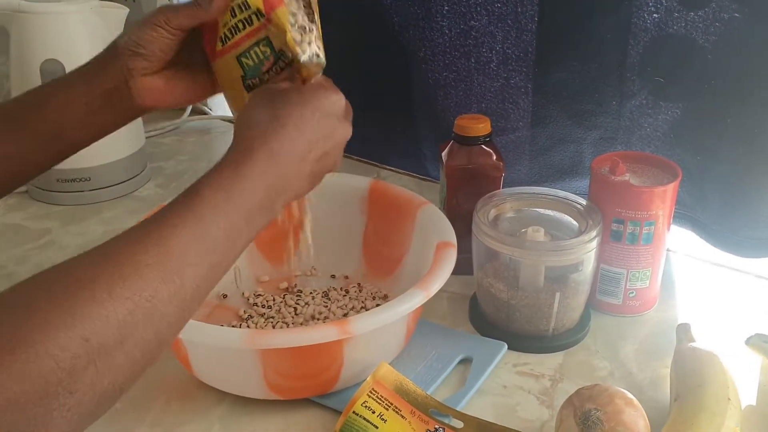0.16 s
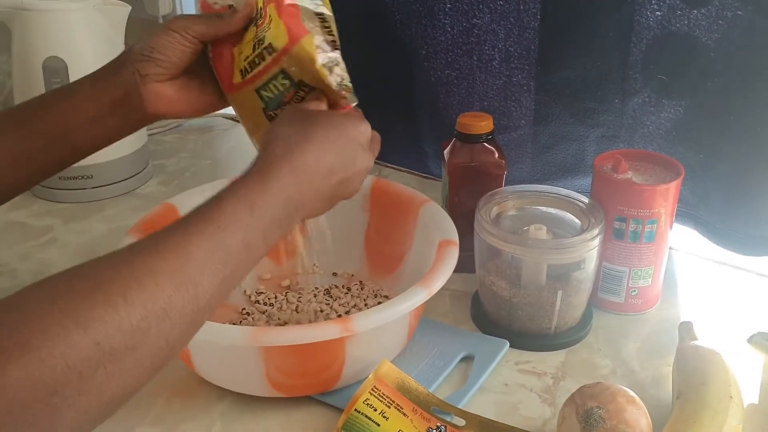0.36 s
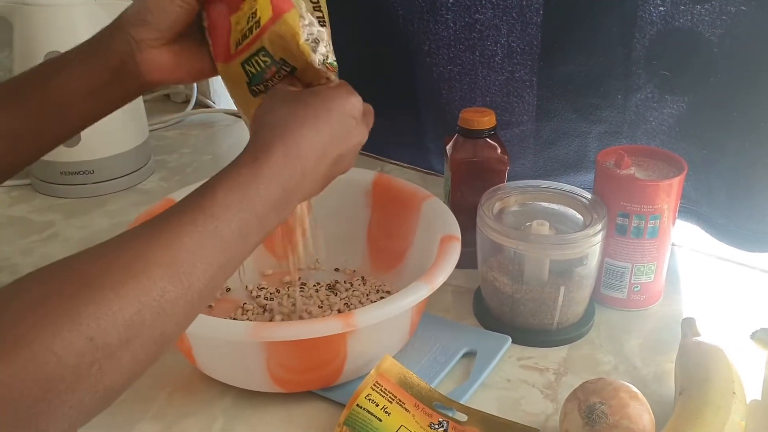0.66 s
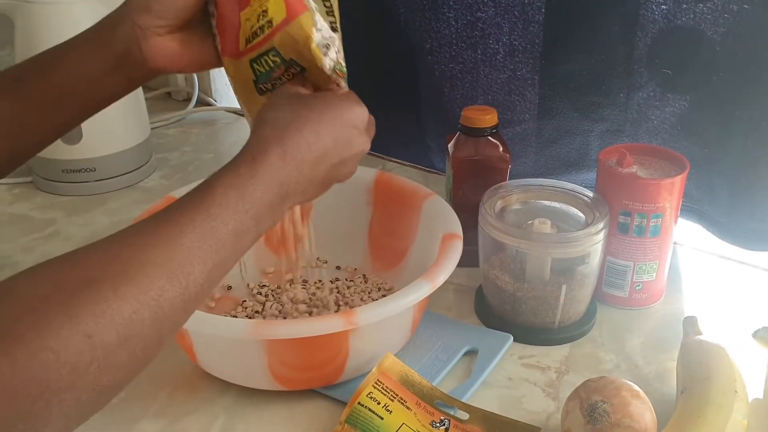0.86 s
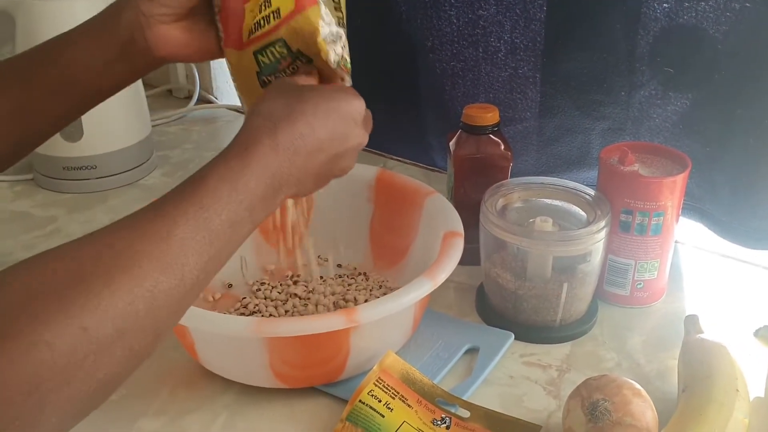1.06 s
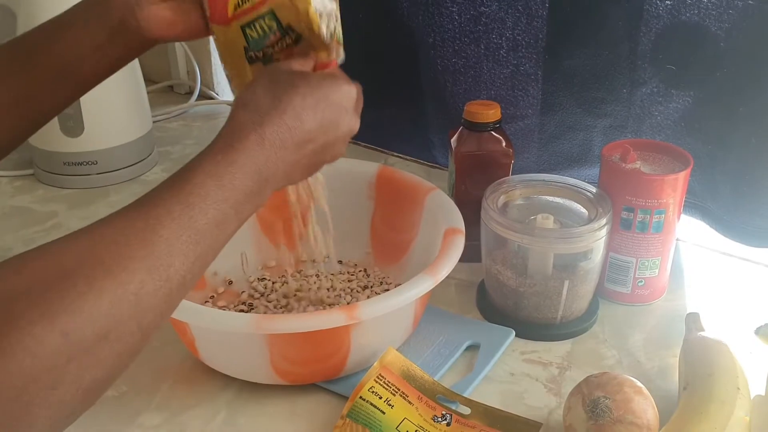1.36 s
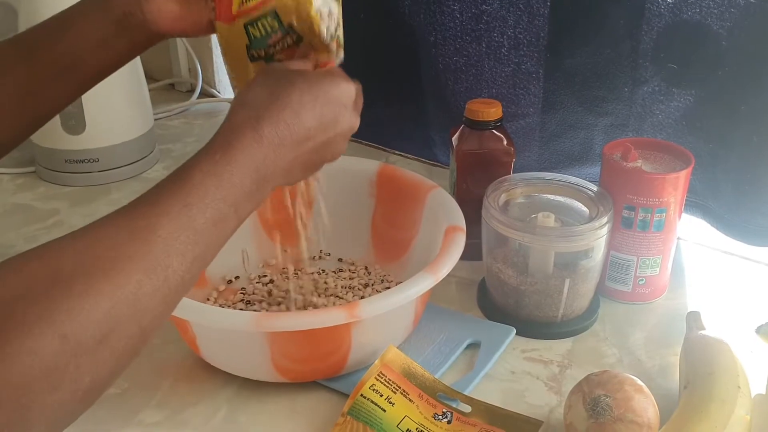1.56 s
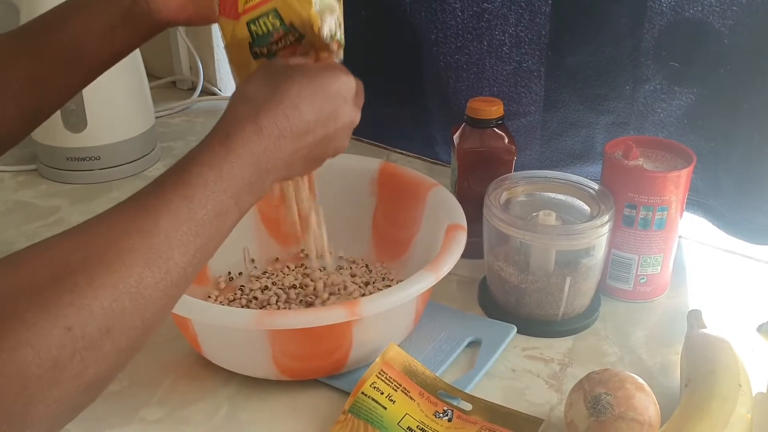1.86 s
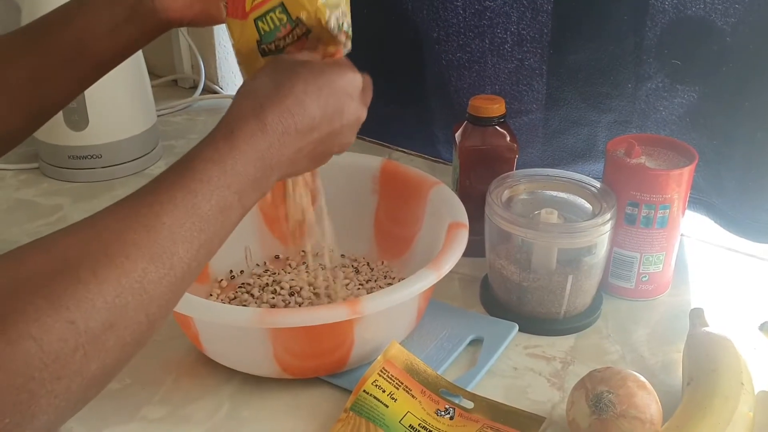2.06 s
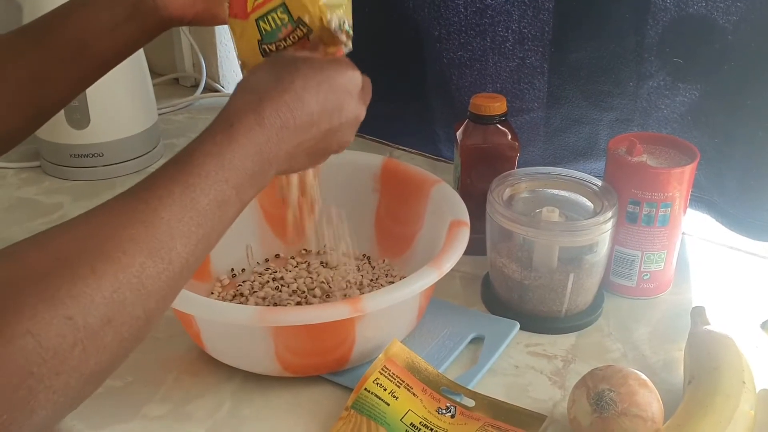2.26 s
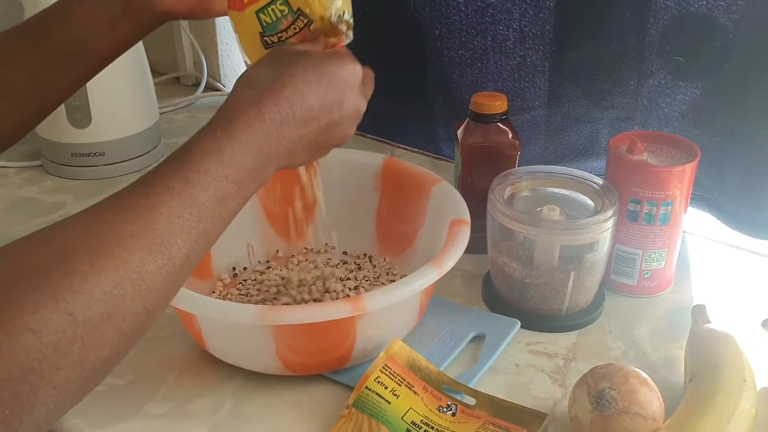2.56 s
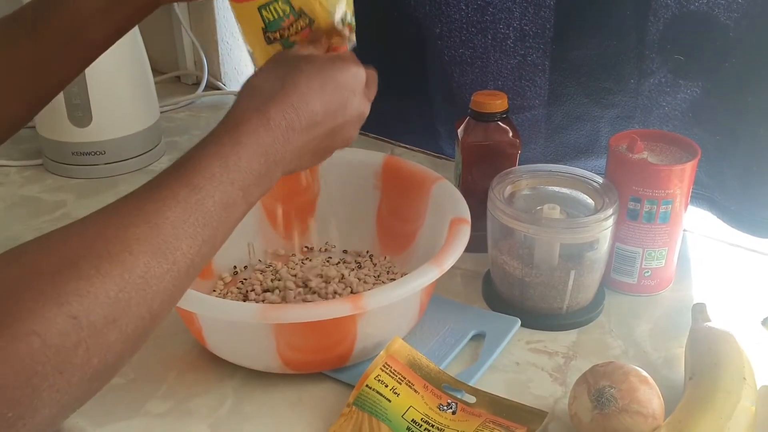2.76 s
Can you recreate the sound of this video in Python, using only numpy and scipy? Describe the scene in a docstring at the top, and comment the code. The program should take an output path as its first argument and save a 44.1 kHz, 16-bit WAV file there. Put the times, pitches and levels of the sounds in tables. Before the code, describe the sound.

Dried beans pour into a plastic bowl, starting sparse, quickly swelling to a dense rattle with sharp clicks and hollow plastic knocks, then thinning out; faint packet crinkle, close stereo microphone in a small kitchen.

```python
"""Dried beans are shaken out of a plastic packet into a plastic bowl on a kitchen counter.
Beans landing on the heap are short pitched clicks; knocks ring the tuned modes of the bowl wall.
Sharp hits stand out as cracks, tones and knocks; the packet rustles as coloured fine crinkles.
Underneath lie a low filtered-noise rumble and a narrow hum that wavers in level and pitch."""
import sys
import numpy as np
from scipy import signal
from scipy.fft import rfft, irfft, next_fast_len
from scipy.io import wavfile

SR = 44100
rng = np.random.default_rng(int(sys.argv[2]) if len(sys.argv) > 2 else 0)


def voltage_ratio(level):
    """Linear amplitude factor for a level in decibels (scalar or array-like)."""
    return 10 ** (np.asarray(level, float) / 20)


def persist_wave(psi):
    """Save psi, clipped to +-1, as 16-bit WAV."""
    counts = np.round(np.clip(psi, -1, 1) * 32767).astype(np.int16)
    wavfile.write(sys.argv[1], SR, np.atleast_2d(counts).T)


N = 127890

# Low rumble of the room, spectrum: pitch_hz [Hz], density_db [dB per Hz]
RUMBLE_SPECTRUM = [(33, -37), (56, 13), (124, 14.5), (177, 19), (231, -73), (330, 0), (430, -20),
                   (730, -120)]
# Level curve of the hum, before its random wavering: start_s [s], level_db [dB]
HUM_LEVEL = [(0.0, -70), (0.04, -65), (0.25, -76), (0.44, -64), (0.64, -75), (0.73, -54), (1.56, -65),
             (1.68, -56), (2.17, -60), (2.21, -61.5), (2.5, -55.5), (2.71, -67), (2.75, -58), (2.9, -76)]
# Rustle of the packet film, spectrum: pitch_hz [Hz], density_db [dB per Hz]
PACKET_SPECTRUM = [(4410, -33), (7500, -3), (10100, -2.5), (13900, 2.5), (15700, -7.5), (16400, -29)]
# Modes of the bowl wall, relative strengths: pitch_hz [Hz], level_db [dB]
BOWL_MODES = [(170, -20), (260, -44), (345, -41), (430, -21), (550, -2), (620, -0.5), (705, 0.5), (790, -8),
              (1037, -5), (1170, -5.5), (1300, -7.5), (1440, -2), (1645, -1.5), (1740, -6.5), (1900, -10),
              (2000, -10.5), (2450, 1), (2630, -7), (2990, -7)]
# Beans landing on the bare wall ring its hollow middle modes more: start_s [s], boost_db [dB]
HOLLOW_BOOST = [(0.0, -0.5), (0.3, -2), (0.42, 0.5), (0.55, 1.5), (0.65, 7), (0.8, 2.5), (0.95, 3.5),
                (1.1, -1), (1.3, 3), (1.5, -1), (1.8, 0.5), (2.3, 1), (2.9, 1.5)]
# Clicks of beans on the heap, spectrum: pitch_hz [Hz], density_db [dB per Hz]
HEAP_SPECTRUM = [(470, -40), (800, -0.5), (900, -5.5), (1600, 0.5), (2100, -2), (2750, -6.5), (3200, -2),
                 (3600, -0.5), (4300, -4), (4800, -7.5), (5600, -7), (6700, -7), (7800, -22), (9000, -17.5),
                 (11700, -69), (19800, -120)]
# Crack of a sharp hit, spectrum: pitch_hz [Hz], density_db [dB per Hz]
CRACK_SPECTRUM = [(500, -30), (1500, -11), (3300, 0), (6900, -2), (8200, -17), (12000, -23), (16000, -27)]
# Sharp hits of beans, each one or several close-set rows, before the common trim:
# start_s [s], level_db [dB], pitch_hz [Hz], crack_db [dB re the tone]
SHARP_HITS = [(0.0058, -9, 1430, -0.5), (0.0934, -12, 1440, -9), (0.1024, -11, 1610, -9),
              (0.116, -3.5, 1620, -9), (0.159, -13, 1590, -2), (0.179, -5, 1590, -9), (0.2548, -7, 3700, 7),
              (0.406, -8.5, 1630, 5), (0.4652, -9, 3700, 2), (0.5082, -5, 1730, -2), (0.649, -6, 3870, -10),
              (0.9233, -3.5, 1700, -4), (0.9784, -6, 3500, -14), (1.0012, 2.5, 3850, -7.5),
              (1.0461, -9.5, 2040, 4), (1.0845, -4, 2460, 1), (1.2876, -0.5, 3460, -12),
              (1.2998, 0, 2220, 1), (1.5824, -1.5, 3720, -6), (1.642, -0.5, 3380, -10),
              (1.809, -0.5, 4200, -3.5), (1.8396, -13, 2380, -10), (1.9225, -5, 2430, -11),
              (2.021, -18, 2590, 10.5), (2.052, -4, 1680, -10), (2.0593, 3, 1700, -22),
              (2.063, -6, 1340, -15), (2.1086, -7, 1310, -13), (2.2565, -4.5, 1330, -18),
              (2.266, -3, 1350, -21), (2.275, -5, 1690, -15), (2.3732, -0.5, 6200, 0),
              (2.3744, -4, 3400, -9.5), (2.4641, -5, 3900, -2), (2.5536, -5.5, 1620, -1),
              (2.6037, -4, 4240, -4), (2.6048, -7, 3020, -10), (2.607, -8.5, 2040, -18),
              (2.615, -13, 3800, -4), (2.6773, -17, 1440, 5), (2.821, -7.5, 2350, -5.5),
              (2.8466, 0, 3370, -5), (2.8518, -9, 1520, -14), (2.8895, -13, 1700, 3)]
# The pouring stream, before the layer trims:
# start_s [s], heap_db [dB], bowl_db [dB re heap], packet_db [dB re heap]
STREAM_LEVELS = [(0.0, -29.5, 5.5, -14), (0.08, -41, 1.5, -23), (0.109, -31, 1.5, -17.5),
                 (0.149, -39, 2, -17), (0.177, -28.5, -1.5, -17), (0.23, -31, 1.5, -17),
                 (0.257, -25.5, -0.5, -14), (0.288, -26.5, -2.5, -18), (0.334, -23.5, -7, -20.5),
                 (0.389, -29.5, 1, -16.5), (0.44, -25.5, -5, -18), (0.475, -26, 0, -18.5),
                 (0.53, -26.5, -4.5, -20), (0.58, -23, -3, -20), (0.675, -23, -7, -17.5),
                 (0.73, -25.5, -4, -19), (0.78, -26.5, -2.5, -18), (0.81, -23, -2, -19),
                 (0.83, -26, -3, -17), (0.894, -22, -2.5, -19), (1.037, -27.5, -4, -19),
                 (1.095, -21.5, -4, -16), (1.136, -25, -1, -19.5), (1.305, -22, -4.5, -17.5),
                 (1.344, -24, -3.5, -19.5), (1.416, -25.5, -1, -19.5), (1.494, -20, -5.5, -15.5),
                 (1.559, -26.5, 0, -20), (1.596, -24.5, 0.5, -15.5), (1.631, -28, 0, -18),
                 (1.653, -24, -3.5, -16), (1.702, -24, -1, -16), (1.772, -28.5, -1.5, -16),
                 (1.804, -27.5, -0.5, -15), (1.839, -27.5, -2.5, -17), (1.881, -24.5, -6, -14),
                 (2.001, -30, 1, -15.5), (2.068, -25.5, -6.5, -11.5), (2.15, -32, 2.5, -13),
                 (2.214, -29, 0, -14.5), (2.268, -26, -3.5, -12.5), (2.355, -32.5, 0.5, -11.5),
                 (2.475, -27.5, -3, -13.5), (2.581, -32.5, -0.5, -15), (2.612, -31, -2.5, -14),
                 (2.668, -33.5, 5.5, -11), (2.703, -29.5, -2, -12.5), (2.789, -39, 4, -13),
                 (2.833, -40, 6, -14), (2.857, -34, -2.5, -6), (2.899, -33, 5, -14)]

# Room
RUMBLE_DB, RUMBLE_SIDE_DB = -60.5, -10  # the side is relative to the mid
HUM_HZ, HUM_WIDTH_HZ = 42, 3.7  # centre and spread of the wandering pitch
KITCHEN_T60_S, KITCHEN_DB, WALL_CUT_HZ = 0.15, -5.5, 6200

# Pouring: mean impact rates, spreads of impact size, layer trims
SPOTS = 16  # landing places
CLUMP_DB, CLUMP_HZ = 1.26, 39.9  # spread and rate of the swings in density
CRINKLES_PER_S, CRINKLE_SPREAD_DB, PACKET_TRIM_DB = 4000, 3.5, 2.2
KNOCKS_PER_S, KNOCK_SPREAD_DB, BOWL_TRIM_DB = 1200, 2.0, 1
BEANS_PER_S, SIZE_SPREAD_DB, HEAP_TRIM_DB = 3500, 2, 1.31
BEAN_CYCLES, BEAN_LOW_HZ, BEAN_HIGH_HZ = 5.9, 898, 10160  # cycles to fall by 60 dB

# Bowl wall
BOWL_T60_S, TRIPLET_SPLIT = 0.04, 0.009  # split as a fraction of the mode pitch
HOLLOW_FROM_HZ, HOLLOW_TO_HZ = 1400, 2100
FILL_DB_PER_S, FILL_FROM_HZ, FILL_BELOW_HZ = -1.5, 300, 900  # the deepening heap damps the low modes

# Sharp hits
HIT_TRIM_DB, HIT_KNOCK_DB = -3, -28
TONE_CYCLES, TONE_RISE_S = 20.0, 0.0006  # cycles to fall by 60 dB
CRACK_T60_S, CRACK_RISE_S = 0.012, 0.0008

# Path to the microphone
SCATTER_T60_S, SCATTER_FROM_HZ = 0.023, 1970
SCATTER_DB, HIT_SCATTER_DB = 5, -9
LEFT_LAG_S, LAG_SPREAD_S = -0.000045, 0.00004  # left behind right; negative is ahead
LEFT_DB = 0.45  # left is raised and right lowered by this
LOW_CUT_HZ = 213  # low cut of the microphone on the pouring sounds, without the room tone
TOP_HZ = 16560


def rms_one(x):
    """Scale to rms 1."""
    return x / np.sqrt(np.mean(x ** 2) + 1e-20)


def in_time(rows):
    """Draw the columns of a curve table sample by sample."""
    start_s, *columns = np.transpose(rows)
    return [np.interp(np.arange(N) / SR, start_s, column) for column in columns]


def colour(x, spectrum):
    """Filter causally (minimum phase) to the given spectrum, by folding its cepstrum."""
    size = 8192
    hz, db = np.transpose(spectrum)
    bins_hz = np.arange(size // 2 + 1) * SR / size
    log_gain = np.interp(np.log(bins_hz + 1), np.log(hz), db) * np.log(10) / 20
    cepstrum = irfft(log_gain)
    cepstrum[1:size // 2] *= 2
    cepstrum[size // 2 + 1:] = 0
    impulse = irfft(np.exp(rfft(cepstrum)))
    filtered = signal.fftconvolve(np.atleast_2d(x), impulse[None], axes=1)
    return filtered[:, :np.shape(x)[-1]].reshape(np.shape(x))


def drift(rate_hz):
    """Slow random wandering with spread 1: noise through a double one-pole low-pass."""
    r = np.exp(-2 * np.pi * rate_hz / SR)
    slow = signal.lfilter([1], [1, -2 * r, r * r], rng.standard_normal(N + SR))[SR:]
    return rms_one(slow - slow.mean())


def ring(impacts, hz, t60_s):
    """Damped resonator: a unit impact sets a sine of height 1 ringing."""
    r, w = voltage_ratio(-60 / (t60_s * SR)), 2 * np.pi * hz / SR
    return signal.lfilter([0, np.sin(w)], [1, -2 * r * np.cos(w), r * r], impacts + 1e-18)


def random_impacts(per_s, spread_db, clump):
    """Chance impacts of uneven size and either sign, denser in clumps."""
    sizes = voltage_ratio(spread_db * np.minimum(rng.exponential(1, N), 5)) * rng.choice([-1, 1], N)
    return sizes * (rng.random(N) < per_s * clump / SR)


def deal_to_spots(impacts):
    """Send each impact to one landing spot picked by chance."""
    return impacts * (rng.integers(0, SPOTS, N) == np.arange(SPOTS)[:, None])


def dying_noise(t60_s, size):
    """Two unrelated bursts of noise dying exponentially, unit energy each."""
    burst = rng.standard_normal((2, size)) * voltage_ratio(-60 * np.arange(size) / SR / t60_s)
    return burst / np.sqrt(np.sum(burst ** 2, axis=1, keepdims=True))


def room_tone():
    """Low coloured rumble and a sine hum wavering in level and pitch, nearly alike on both sides."""
    noise = rng.standard_normal((2, N))
    mid, side = rms_one(colour(noise, RUMBLE_SPECTRUM)) * voltage_ratio(RUMBLE_DB)
    hum_db = in_time(HUM_LEVEL)[0] + 4.2 * drift(3.4)
    turns = np.cumsum(HUM_HZ + HUM_WIDTH_HZ * drift(3.2)) / SR
    hum = voltage_ratio(hum_db) * np.sqrt(2) * np.sin(2 * np.pi * turns)
    return mid + hum + voltage_ratio(RUMBLE_SIDE_DB) * side * [[1], [-1]]


def kitchen(x):
    """Room reverb: a dull dying tail, other on each side, starting 5 ms late."""
    walls = signal.lfilter(*signal.butter(1, WALL_CUT_HZ, fs=SR), dying_noise(KITCHEN_T60_S, SR // 2))
    walls = np.pad(walls, ((0, 0), (SR // 200, 0)))
    return voltage_ratio(KITCHEN_DB) * signal.fftconvolve(x[None], walls, axes=1)[:, :N]


def to_microphone(x, scatter_db, lag_spread_s):
    """Direct sound with a small lag between sides, and treble scattered by the bowl, other on each side."""
    lag = (LEFT_LAG_S + lag_spread_s * rng.standard_normal()) * SR
    size = next_fast_len(N + 2000)
    # half the lag on each side, as opposite phase turns
    turn = np.exp(-1j * np.pi * lag * np.arange(size // 2 + 1) / size)
    direct = irfft(rfft(x, size) * [turn, turn.conj()], size)[:, :N]
    treble = signal.butter(2, SCATTER_FROM_HZ, "high", fs=SR)
    scatter = signal.lfilter(*treble, dying_noise(SCATTER_T60_S, 1500))
    return direct + voltage_ratio(scatter_db) * signal.fftconvolve(x[None], scatter, axes=1)[:, :N]


def packet(clump):
    """Thin plastic film rustles as many fine crinkles, coloured by a filter."""
    crinkles = random_impacts(CRINKLES_PER_S, CRINKLE_SPREAD_DB, clump)
    return rms_one(colour(deal_to_spots(crinkles), PACKET_SPECTRUM)) / np.sqrt(SPOTS)


def bowl(knocks):
    """Knocks strike each wall mode at random strength; each is a close triplet radiating from different spots."""
    out = np.zeros((SPOTS, N))
    hollow_db, = in_time(HOLLOW_BOOST)
    fill_db = FILL_DB_PER_S * np.arange(N) / SR
    for k, (hz, db) in enumerate(BOWL_MODES):
        level_db = db + (FILL_FROM_HZ < hz < FILL_BELOW_HZ) * fill_db
        level_db = level_db + (HOLLOW_FROM_HZ < hz < HOLLOW_TO_HZ) * hollow_db
        for part in range(3):
            strikes = knocks * voltage_ratio(level_db) * rng.standard_normal(N)
            part_hz = hz * (1 + TRIPLET_SPLIT * (part - 1))
            out[(k + 3 * part) % SPOTS] += ring(strikes, part_hz, BOWL_T60_S)
    return out


def sharp_hits():
    """Each row is a short noise crack plus a decaying tone; also returns the knocks on the wall."""
    out, knocks, t = np.zeros(N + SR), np.zeros(N), np.arange(SR // 20) / SR
    crack_shape = (1 - np.exp(-t / CRACK_RISE_S)) * voltage_ratio(-60 * t / CRACK_T60_S)
    cracks = colour(rng.standard_normal((len(SHARP_HITS), len(t))) * crack_shape, CRACK_SPECTRUM)
    for (start_s, db, hz, crack_db), crack in zip(SHARP_HITS, cracks):
        i = int(start_s * SR)
        tone_shape = (1 - np.exp(-t / TONE_RISE_S)) * voltage_ratio(-60 * t * hz / TONE_CYCLES)
        tone = tone_shape * np.sin(2 * np.pi * hz * t)
        crack = voltage_ratio(crack_db) * crack / np.abs(crack).max()
        out[i:i + len(t)] += voltage_ratio(db + HIT_TRIM_DB) * (crack + tone)
        knocks[i] = voltage_ratio(db + HIT_TRIM_DB + HIT_KNOCK_DB)
    return out[:N], knocks


def heap(clump):
    """Beans click on the heap, each at one of 30 pitches, a few cycles long, at any one of the spots."""
    falls = deal_to_spots(random_impacts(BEANS_PER_S, SIZE_SPREAD_DB, clump))
    dealt = rng.integers(0, 30, N)
    out = np.zeros((SPOTS, N))
    for k, hz in enumerate(np.geomspace(BEAN_LOW_HZ, BEAN_HIGH_HZ, 30)):
        out += hz * ring(falls * (dealt == k), hz, BEAN_CYCLES / hz)
    return rms_one(colour(out, HEAP_SPECTRUM)) / np.sqrt(SPOTS)


def scene():
    """Mix many landing spots, each with its own path to the microphone, over the room tone."""
    heap_db, bowl_db, packet_db = in_time(STREAM_LEVELS)
    clump = voltage_ratio(CLUMP_DB * drift(CLUMP_HZ))
    hits, hit_knocks = sharp_hits()
    stream_knocks = random_impacts(KNOCKS_PER_S, KNOCK_SPREAD_DB, clump)
    wall = rms_one(bowl(stream_knocks)) / np.sqrt(SPOTS)

    spots = voltage_ratio(heap_db + packet_db + PACKET_TRIM_DB) * packet(clump)
    spots += voltage_ratio(heap_db + bowl_db + BOWL_TRIM_DB) * wall
    spots += bowl(hit_knocks)
    spots += voltage_ratio(heap_db + HEAP_TRIM_DB) * heap(clump)

    near = to_microphone(hits, HIT_SCATTER_DB, 0) + kitchen(hits)
    for x in spots:
        near += to_microphone(x, SCATTER_DB, LAG_SPREAD_S) + kitchen(x)
    near = signal.sosfilt(signal.butter(3, LOW_CUT_HZ, "high", fs=SR, output="sos"), near)
    return near * voltage_ratio(np.array([[LEFT_DB], [-LEFT_DB]]) - 3.5) + room_tone()


def band_limit(x):
    """A steep low-pass at the top of the band."""
    return signal.sosfilt(signal.butter(12, 16510, fs=SR, output="sos"), x)


def record(dry):
    """Cut the extreme top steeply and finish the mix."""
    top_cut = signal.cheby2(20, 60, TOP_HZ, fs=SR, output="sos")
    mix = signal.sosfilt(top_cut, dry)
    return band_limit(mix)


dry = scene()
out = record(dry)
persist_wave(out)
```